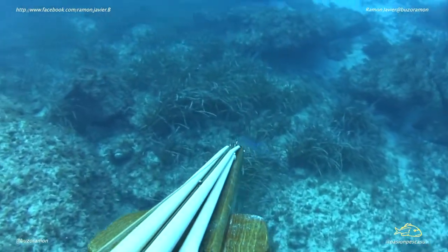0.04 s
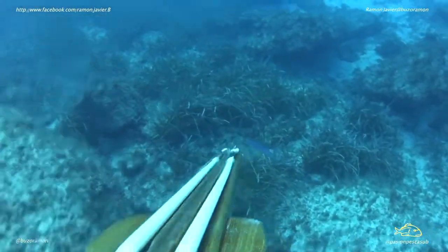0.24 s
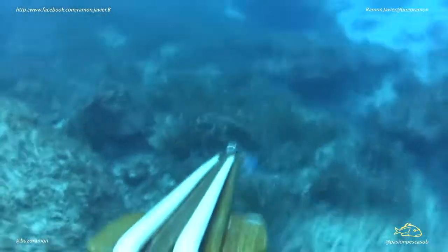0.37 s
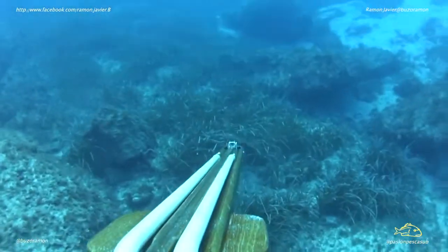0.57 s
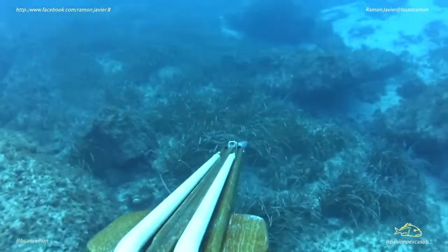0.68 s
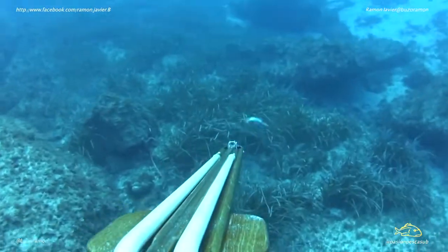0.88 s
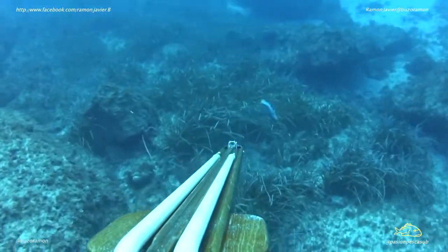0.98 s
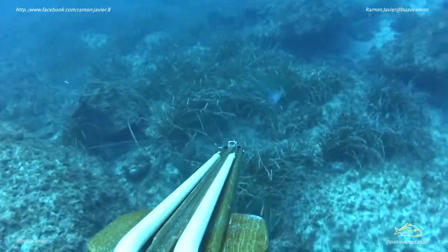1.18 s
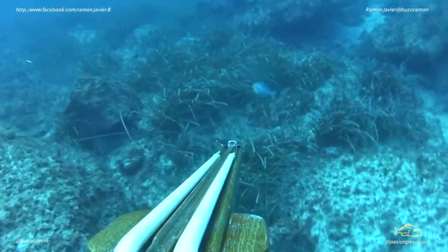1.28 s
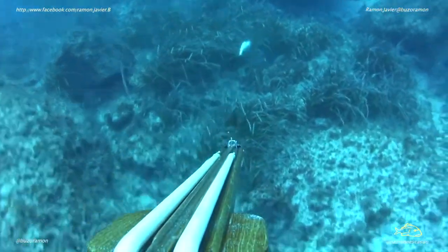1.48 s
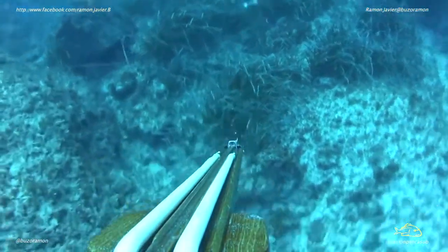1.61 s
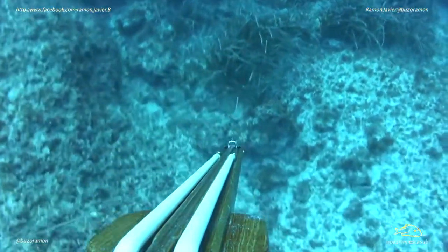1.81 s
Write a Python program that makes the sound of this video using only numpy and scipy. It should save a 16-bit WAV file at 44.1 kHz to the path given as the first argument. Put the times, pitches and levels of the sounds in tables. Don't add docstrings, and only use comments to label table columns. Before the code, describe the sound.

A band speargun fires underwater, a loud clattering crack with rubbing bands and a low recoil thud, dying within half a second; light rattles and later taps follow over faint water hush, heard through a gun-mounted camera housing.

```python
import sys
import numpy as np
from scipy import signal
from scipy.io import wavfile
from scipy.ndimage import uniform_filter1d

SR = 44100
rng = np.random.default_rng(int(sys.argv[2]) if len(sys.argv) > 2 else 0)


def dump_mix(stems):
    frames = np.atleast_2d(stems).T
    limited = np.clip(frames, -1, 1)
    pcm = np.round(limited * 32767).astype(np.int16)
    wavfile.write(sys.argv[1], SR, pcm)


def gain_from_db(level_db):
    decades = np.asarray(level_db, float) / 20
    return 10 ** decades


N = 81585

APART = 0.5


def read(points, hz):
    f, value = np.transpose(points)
    return np.interp(np.log(hz + 1), np.log(f + 1), value)


def ports(z, lead):
    return (z * np.exp([[0.5j * lead], [-0.5j * lead]])).real


def ring(force, hz, width):
    return signal.lfilter([1], [1, -np.exp((2j * hz - width) * np.pi / SR)], force)


def hush(shape, db, patchy_db):
    frames, hz = N // 256 + 5, np.fft.rfftfreq(1024, 1 / SR)
    real, imag, patches = rng.standard_normal((frames, 513, 3)).T
    patches = uniform_filter1d(patches, size=6, axis=0)
    patches = uniform_filter1d(patches, size=8, axis=1)
    patch_db = patchy_db * patches / patches.std() * (hz[:, None] < 1500)
    spectrum = (real + 1j * imag) * gain_from_db(read(shape, hz)[:, None] + patch_db)
    x = signal.istft(spectrum, nperseg=1024, noverlap=768)[1][:N]
    return gain_from_db(db) * x / x.std()


def water():
    # (frequency [Hz], density [dB per Hz])
    alike_shape = [(20, -34), (60, -17), (190, -12), (300, 0), (490, -8.5), (674, -4), (1190, -8.5),
                   (11000, -20)]
    # (frequency [Hz], density [dB per Hz])
    opposed_shape = [(40, -21.5), (400, -14.5), (600, -11.5), (980, -10.5), (9200, -38), (11000, -39)]
    alike = hush(alike_shape, -69, patchy_db=3.5)
    opposed = hush(opposed_shape, -65, patchy_db=1.0)
    return np.array([alike + opposed, alike - opposed])


def sway():
    # (frequency [Hz], width [Hz], level [dB], left
    # leads right [rad], until [s])
    hums = [
        (35.2, 6.7, -76.5, 0.44, 3),
        (132, 14, -76.5, 2.1, 3),
        (610, 27, -67, 3.3, 3),
        (414, 25, -73, 1.6, 0.7),
        (787, 79, -73, 1.4, 0.22),
    ]
    out, t = np.zeros((2, N)), np.arange(N) / SR
    for hz, width, db, lead, until in hums:
        draw = rng.standard_normal((N, 3)).T
        force = draw[0] + APART * np.sin(lead) * draw[1:]
        z = ring(ring(force, hz, width), hz, 3 * width)
        fade = np.clip((until - t) / 0.022, 0, 1)
        out += gain_from_db(db) * ports(z / z.real.std(), lead) * fade
    return out


def loose_fitting():
    # (time [s], level [dB], brightness [dB per octave], length [ms])
    rattles = [(.517, -57, -2, 4.2), (.537, -56, 1, 4.3), (.548, -45.5, 1, 8), (.563, -61, 4.5, 4.4),
               (.586, -53.5, -2, 11), (.605, -50, -5, 6.7), (.636, -53.5, 0, 7.5), (.657, -58, -0.5, 10),
               (.759, -50, -1, 6.4), (.78, -63, 1.5, 7.9), (.82, -54.5, 3.5, 9.4), (.834, -54.5, -1.5, 7.5),
               (.916, -55.5, 2.5, 7.7), (.928, -58.5, 0.5, 10), (1.349, -61.5, 4, 6.9),
               (1.513, -50, 0, 2.9), (1.523, -51.5, 0.5, 4.1), (1.551, -54, -2, 4.4)]
    # (frequency [Hz], t60 [s], level [dB], left leads right [rad])
    modes = [(675, 0.066, -1, 2.16), (1100, 0.022, -5, 1.8), (1722, 0.038, -8.5, 1.3),
             (2874, 0.0099, -9, 0.79), (4150, 0.013, -21, 1), (2250, 0.0092, -19.5, 2.2),
             (6537, .003, -20, 1.0)]
    mode_shift = 0.05
    out, t = np.zeros((2, N)), np.arange(5000) / SR
    draws = rng.standard_normal((len(rattles), len(modes), 5000))
    for (s, db, tilt_db, ms), draw in zip(rattles, draws):
        u = 1000 * t / max(ms, 1)
        burst = u * np.exp(-3 * u)
        part = out[:, round(s * SR):][:, :len(t)]
        for (hz, t60, mode_db, lead), noise in zip(modes, draw):
            hz = hz * (1 + mode_shift * np.tanh(noise[0]))
            z = ring(ring(noise * burst, hz, 2.33 / t60), hz, 0.45 * hz)
            level = gain_from_db(db + mode_db + tilt_db * np.log2(hz / 800))
            part += level * ports(z / abs(z).max(), lead)[:, :part.shape[1]]
    return out


def panels():
    # (time [s], frequency [Hz], level [dB], t60 [s])
    strikes = [(.2145, 895, -4.5, 0.04), (.239, 830, -15, 0.036), (.253, 744, -4, 0.061),
               (.27, 828, -5.5, 0.085), (.277, 947, -10.5, 0.098), (.287, 633, -11.5, 0.055),
               (0.312, 419, -21, 0.055), (.331, 269, -16, 0.052), (.407, 287.6, -16.5, 0.082),
               (.2155, 2592, -19, 0.03), (.408, 1265, -19, 0.057), (.2355, 6200, -22, 0.014),
               (0.2152, 6850, -25.5, 0.0095), (0.445, 4170, -37, 0.039), (0.448, 7000, -42.5, 0.05),
               (.519, 804, -32, 0.047), (.55, 775, -30.5, 0.034), (.603, 827, -42.5, 0.047),
               (1.4967, 1100, -28.5, 0.019), (1.4983, 2270, -33.5, 0.026), (1.497, 3540, -43.5, 0.0094),
               (1.502, 837, -36.5, 0.077), (1.533, 3260, -51.5, 0.014), (1.534, 2250, -46.5, 0.012),
               (1.5336, 980, -35.5, 0.018), (1.539, 750, -36, 0.049), (1.422, 688, -52.5, .09)]
    # (frequency [Hz], phase [rad])
    panel_lead = [(300, .4), (700, 2.0), (2600, 1.3), (7000, 0.73)]
    rise_cycles = 0.83
    out, t = np.zeros((2, N)), np.arange(6000) / SR
    for (s, hz, db, t60), turn in zip(strikes, rng.random(len(strikes))):
        shape = (1 - np.exp(-t * hz / rise_cycles)) * gain_from_db(db - 60 * t / t60)
        z = shape * np.exp(2j * np.pi * (hz * t + turn))
        part = out[:, round(s * SR):][:, :len(t)]
        part += ports(z, read(panel_lead, hz))[:, :part.shape[1]]
    return out


def barrel():
    # (time [s], frequency [Hz], level [dB], rise [ms], t60 [s])
    swings = [(.21, 135.5, -18.5, 10, 0.27), (0.212, 37.4, -39, 18, 0.76), (0.289, 85.1, -14.5, 9.6, 0.38),
              (0.299, 132, -21.5, 7.5, 0.51), (0.309, 170, -19, 12, 0.24), (.37, 36.1, -27.5, 47, 0.41),
              (0.432, 84.5, -27, 106, 0.41), (0.516, 130, -41, 11, 0.383), (1.44, 132, -70.5, 18.5, .3),
              (1.518, 132, -60, 14.4, 0.97), (1.6, 123.2, -51, 14, 0.22), (.203, 72.1, -30, 8, .12)]
    # (frequency [Hz], phase [rad])
    swing_lead = [(36, 1.1), (134, 1.1)]
    wobble_depth, wobble_s = 0.45, 0.035
    out = np.zeros((2, N))
    for s, hz, db, ms, t60 in swings:
        t = np.maximum(np.arange(N) / SR - s, 0)
        draw = rng.standard_normal((N, 2)).T
        wobble = ring(ring(draw[0] + 1j * draw[1], 0, 1 / wobble_s), 0, 1 / wobble_s)
        swell = (1 - np.exp(-1000 * t / ms)) ** 2
        shape = swell * gain_from_db(db - 60 * t / t60) * (1 + wobble_depth * wobble / wobble.std())
        out += ports(shape * np.exp(2j * np.pi * hz * t + 1j * draw[0, 0]), read(swing_lead, hz))
    return out


def colour_db(hz, tilt_db, steel_db, thud_db):
    tilt = tilt_db * np.clip(np.log2(hz / 800), 0, 2)
    return tilt + steel_db * (hz > 4500) + thud_db * (hz < 500)


def clicks(per_s, spread_db):
    when, sign, size = rng.random((N, 3)).T
    size_db = spread_db * np.minimum(-np.log(size + 1e-9), 4)
    x = (when < per_s / SR) * np.sign(sign - 0.5) * gain_from_db(size_db)
    return x / np.sqrt(np.mean(x ** 2))


def knocks(rows, hz, apart):
    knock_ms, hard_db = 2.68, 8
    scatter_db = 1.5
    out, t = np.zeros((2, N)), np.arange(512) / SR
    draws = rng.standard_normal((len(rows), 3, 513))
    for (s, db, *colour), draw in zip(rows, draws):
        hardness = 2 ** np.clip(colour[0] / hard_db, -0.5, 1)
        scrape = (draw[0, 1:] + apart * draw[1:, 1:]) * np.exp(-1000 * t / knock_ms * hardness)
        at_mode = abs(scrape @ np.exp(2j * np.pi * hz * t)).mean() + 0.435 * np.linalg.norm(scrape[0])
        level = gain_from_db(db + colour_db(hz, *colour) + scatter_db * draw[0, 0] - 5.0)
        part = out[:, round(s * SR):][:, :512]
        part += (level * scrape / at_mode)[:, :part.shape[1]]
    return out


def housing():
    # (time [s], force [dB], brightness [dB per octave], steel [dB], thud [dB])
    impacts = [(0.196, -28.5, -6.5, 2, 5), (0.21, -12.5, -4, 19, -0.5), (0.215, -11, 6.5, -19, -2),
               (0.22, -15.5, 6, 5.5, -6), (0.235, -9.5, 6.5, -13, 1), (0.239, -8, -4.5, -4, -2),
               (0.255, -6, -6, -24, -10), (0.267, -7.5, 2, 4, -4), (0.273, -18, 2.5, 8, -13),
               (0.284, -14, 3.5, -1, 11.5), (0.311, -16, -9, -3, 11), (0.329, -13.5, -3.5, -1, 3.5),
               (0.34, -11, -2, 6.5, -2), (0.358, -12, 1, -14, -12), (0.361, -13, 0.5, -14, 7.5),
               (0.387, -17, 2, 2.5, 2), (0.407, -17, 2, 4.5, 2), (0.412, -18, 2.5, -1, -10),
               (0.445, -39, 11, -8, 0), (0.449, -22.5, 2, 2, -10), (0.47, -34.5, 11, 3, -10),
               (0.474, -28.5, 5.5, 9.5, -1), (0.498, -39, 7, -12, 3), (0.504, -44.5, 8.5, 1.5, -15),
               (0.521, -42, -11, -1, -3), (0.55, -36.5, -3.5, 5, -25), (0.604, -47, 3, -7, 4.5),
                (0.619, -39.5, -10.5, -6, 1.5), (0.638, -52, 1.5, -14.5, -11),
                (0.657, -46, 0.5, 12.5, -4.5), (0.686, -46, -11, -5.5, -10), (0.708, -51, -5, 2, -18.5),
                (0.761, -58.5, -11, -2, 1), (0.821, -60.5, 6.5, 0.5, -15.5), (0.867, -61, 1.5, 1.5, -15),
                (0.916, -57.5, 6, -7, -11),
               (1.024, -61, 7, -12.5, -7.5), (1.17, -57.5, 3, -11, -3), (1.219, -58, 1.5, -16, -4.5),
            (1.347, -60, -8, -2, 13.5), (1.422, -56, -2, 1, -4), (1.497, -30.5, 6, -15.5, -1),
            (1.534, -35, -1.5, 6, -6), (1.585, -46, -5.5, 0, -7.5), (1.607, -47, -5, -13.5, -6),
            (1.684, -51.5, -6.5, -6, 4.5), (1.781, -50, -7, -17, 5)]
    # (time [s], force [dB], brightness [dB per octave], steel [dB], thud [dB])
    drag_path = [
        (0.195, -52, 1, -12, 11),
        (0.217, -27.5, 8.5, 8, -1),
        (0.231, -22, 0.5, -5.5, -1),
        (0.261, -17.5, -1.5, 0.5, -4),
        (.33, -22, 1, 6.5, 6.5),
        (0.415, -31, 4, 0, 12.5),
        (0.433, -40, 5.5, 2, -1.5),
        (.52, -56, 4.5, 0, 8),
        (.74, -71, -6, 0, -7),
    ]
    # (frequency [Hz], t60 [s], level [dB], left leads right [rad])
    housing_modes = [(258.6, 0.046, -10.5, 0.44), (308.6, 0.069, -5, 0.77), (414.8, 0.046, -7, 1.7),
                     (615, .06, 3, 2.95), (684.5, 0.056, 0, 2.07), (814, 0.029, 1.5, 1.5),
                     (976, 0.039, -7.5, 1.216), (1091.4, 0.032, -6, 1.9), (1212, 0.039, -9.5, 0.63),
                     (1385, 0.026, -2.5, 2.69), (1663, 0.027, -13.5, 1.1), (1890, 0.02, -7.5, 2),
                     (2203, 0.017, -8.5, 1.68), (2669, 0.017, -8.5, 1.6)]
    steel_modes = [(3330, .007, -15, 1.6), (4320, 0.016, -24.5, 0.38), (4800, 0.0023, -30, 9.9),
                   (6200, 0.0068, -19.5, 1.7), (6930, 0.0079, -23.5, 0.7), (6620, 0.0022, -21, 0.5),
                   (8900, 0.0072, -34, 0.91), (10420, 0.0058, -40, 0.43)]
    wander, wander_s, wander_from_hz = 0.045, 0.012, 2000
    soft = 0.83
    creak_db, creak_tilt_db = -81, 0

    t, out = np.arange(N) / SR, np.zeros((2, N))
    s, db, *colour = np.transpose(drag_path)
    force_db = np.interp(t, s, db, -150, -150)
    colour = [np.interp(t, s, c) for c in colour]
    drag = clicks(per_s=1800, spread_db=3.5)
    creak = clicks(per_s=210, spread_db=6.2)
    for hz, t60, mode_db, lead in housing_modes + steel_modes:
        draw, apart = rng.standard_normal((N, 4)).T, APART * np.sin(lead)
        spot = 0.89 + draw[0] + apart * draw[1:3]
        drift = ring(draw[3], 0, 1 / wander_s).real
        shift_hz = hz * wander * (hz > wander_from_hz) * drift / drift.std()
        turn = np.exp(2j * np.pi * np.cumsum(shift_hz) / SR)
        rub = drag * gain_from_db(force_db - 4 - 23 + colour_db(hz, *colour))
        rub = rub + creak * gain_from_db(creak_db - 20.5 + np.log2(hz / 800) * creak_tilt_db)
        force = knocks(impacts, hz, apart) + spot * rub
        rise = 1 - np.exp(-np.pi * soft * hz / SR)
        pushed = ring(force, hz, soft * hz)
        z = rise * turn * ring(pushed / turn, hz, 2.44 / t60)
        out += gain_from_db(mode_db) * ports(z, lead)
    return out


def scene():
    return water() + sway() + loose_fitting() + panels() + barrel() + housing()


def band_limit(x):
    return signal.sosfilt(signal.butter(12, 12180, fs=SR, output="sos"), x)


def record(dry):
    edge = signal.firwin(255, 11150, window=("kaiser", 8), fs=SR)
    overloaded = 1.34 * np.tanh(dry / 1.033)
    mix = signal.oaconvolve(overloaded, edge[None], "same")
    return band_limit(mix)


dry = scene()
out = record(dry)
dump_mix(out)
```